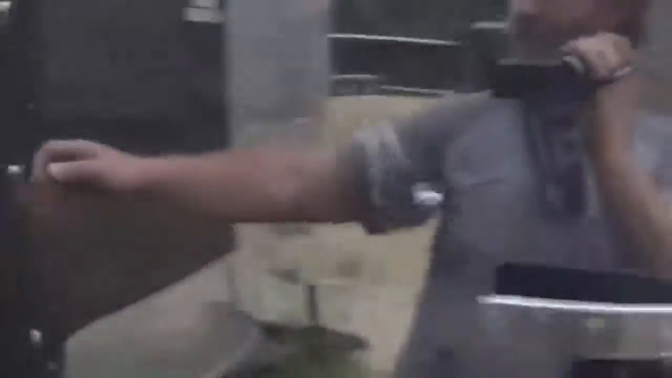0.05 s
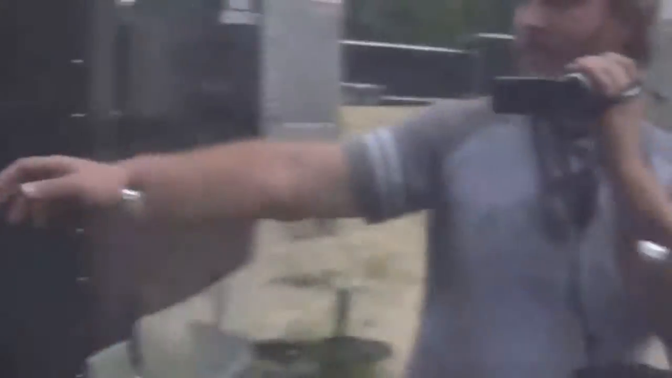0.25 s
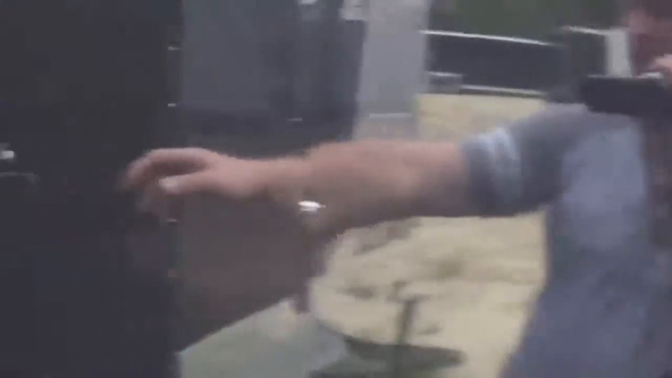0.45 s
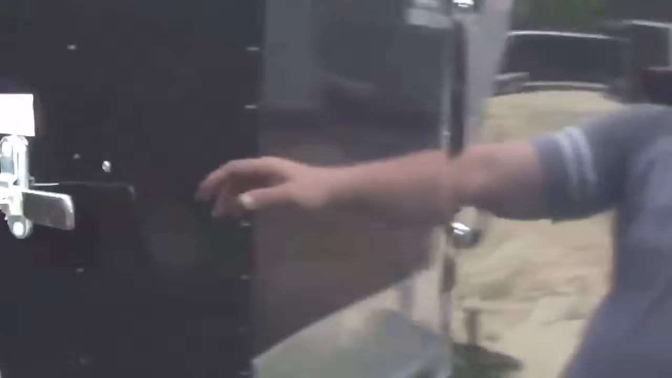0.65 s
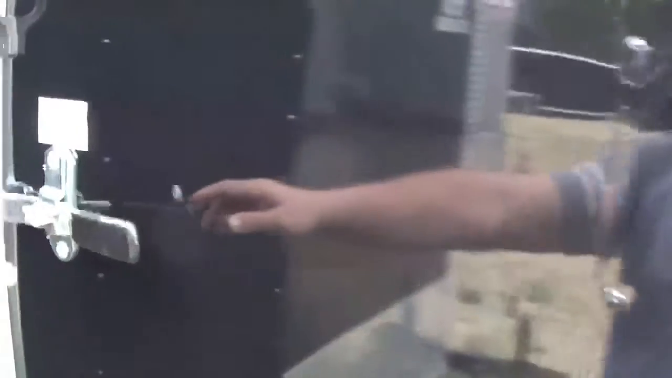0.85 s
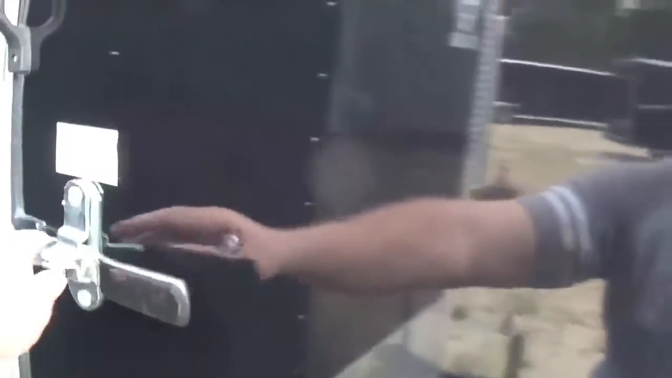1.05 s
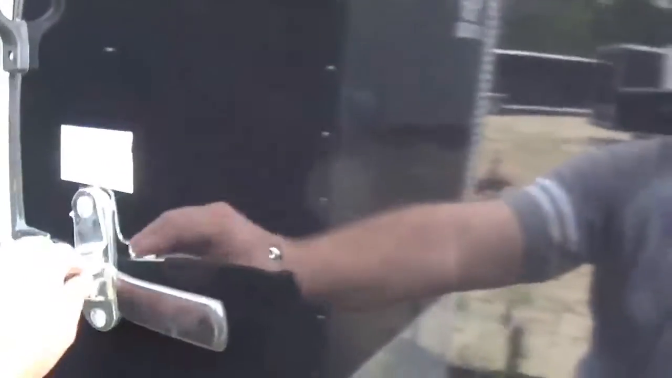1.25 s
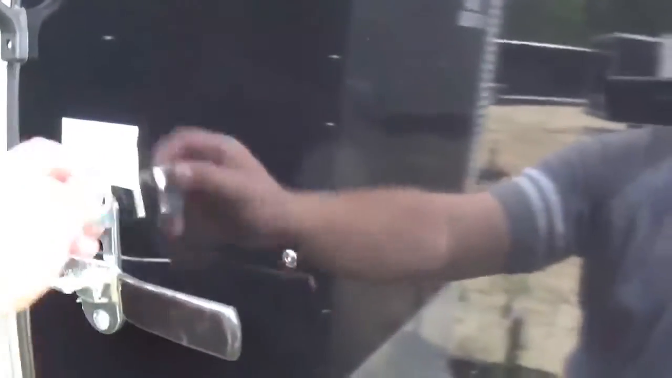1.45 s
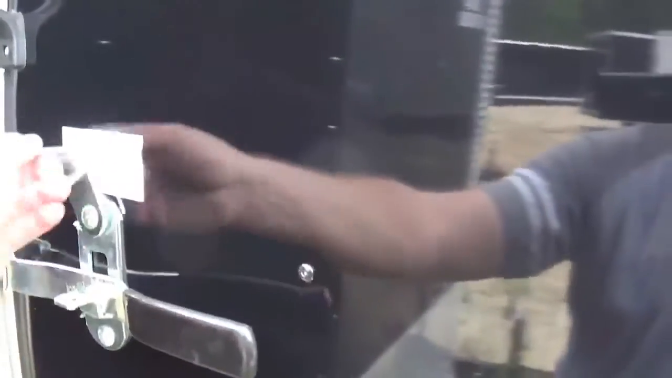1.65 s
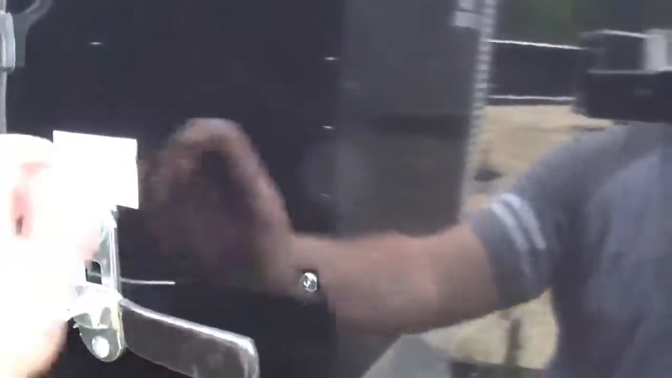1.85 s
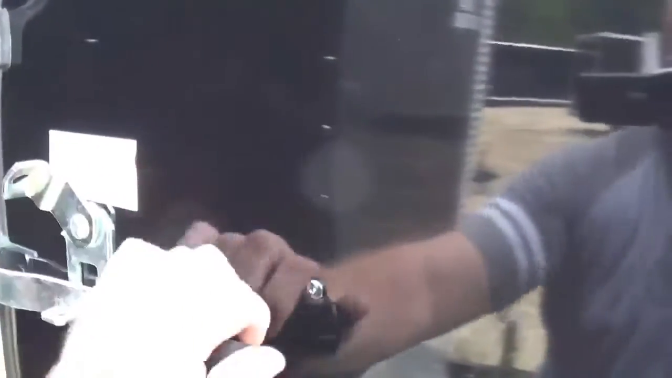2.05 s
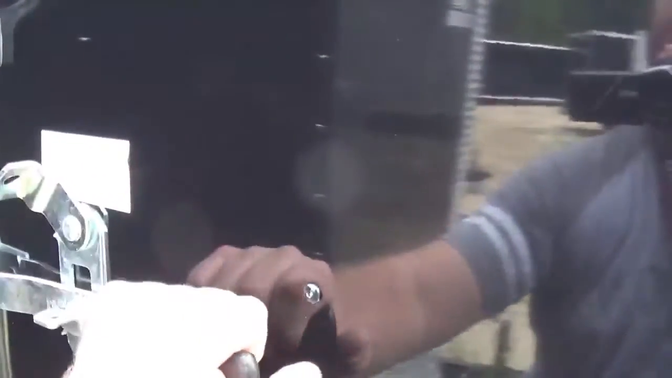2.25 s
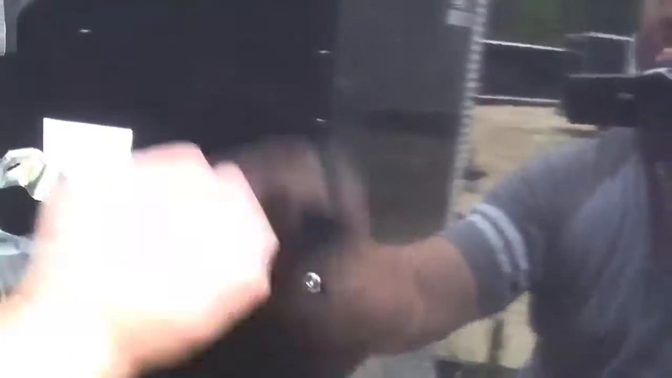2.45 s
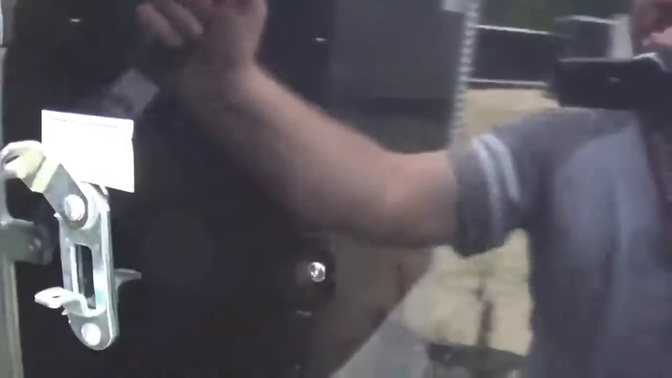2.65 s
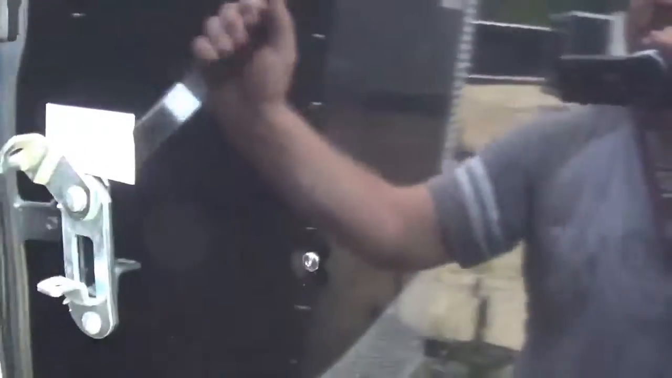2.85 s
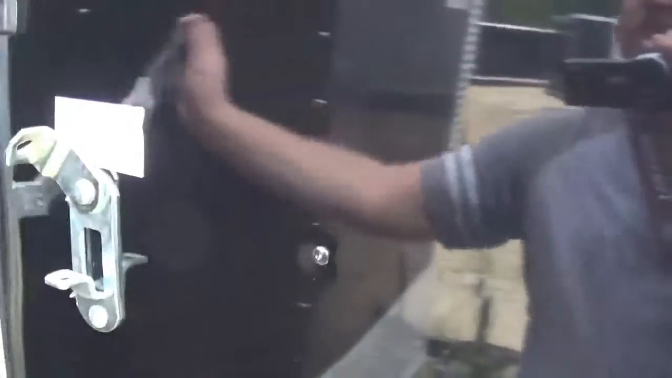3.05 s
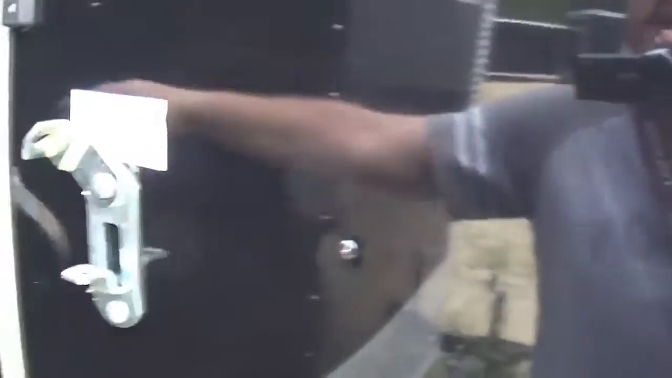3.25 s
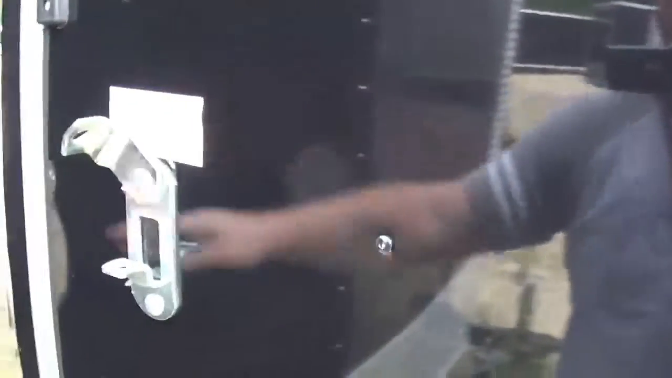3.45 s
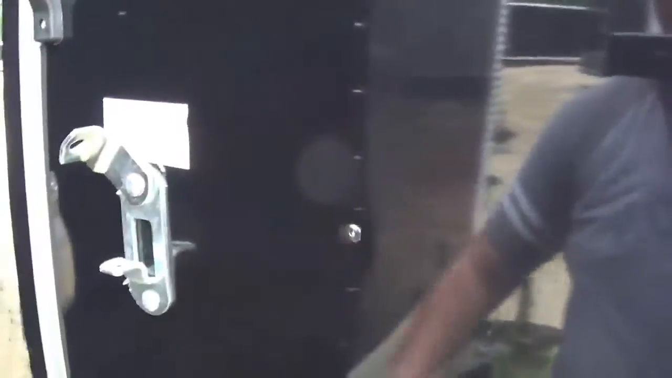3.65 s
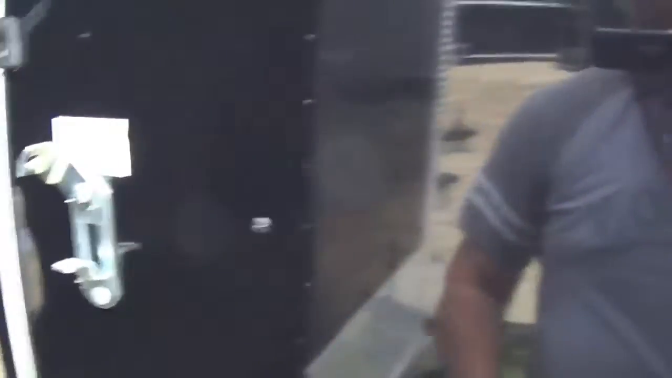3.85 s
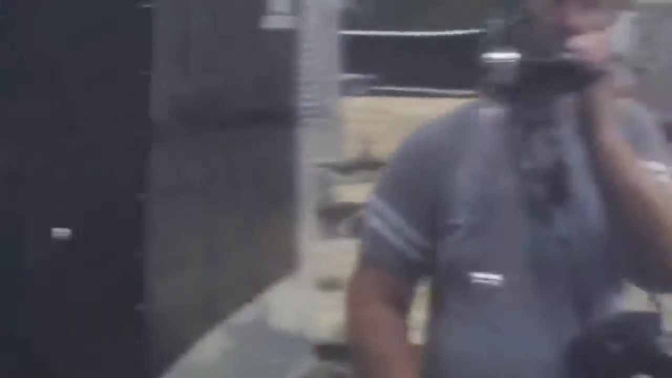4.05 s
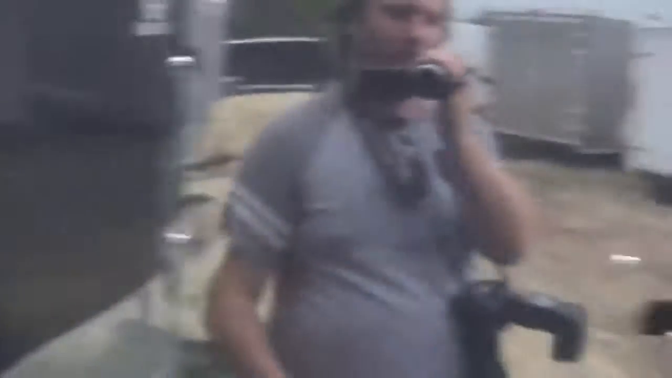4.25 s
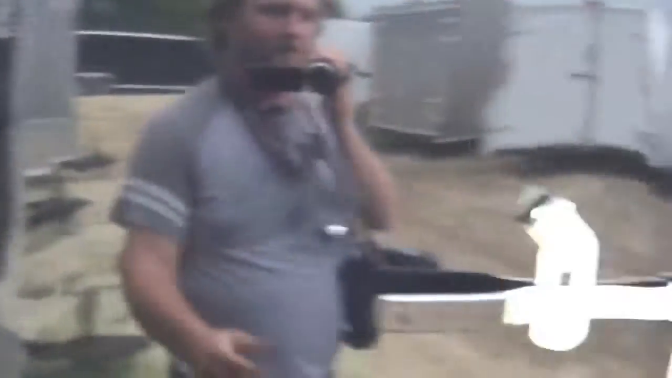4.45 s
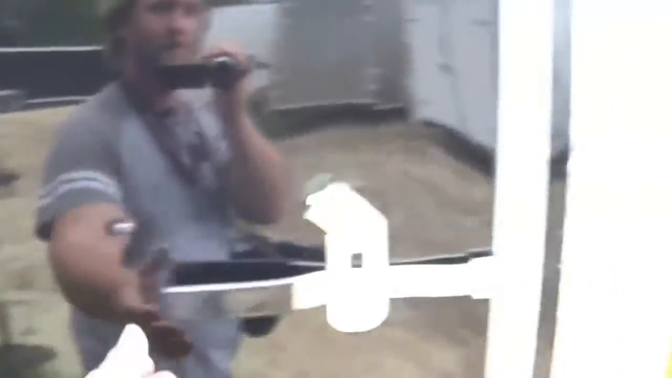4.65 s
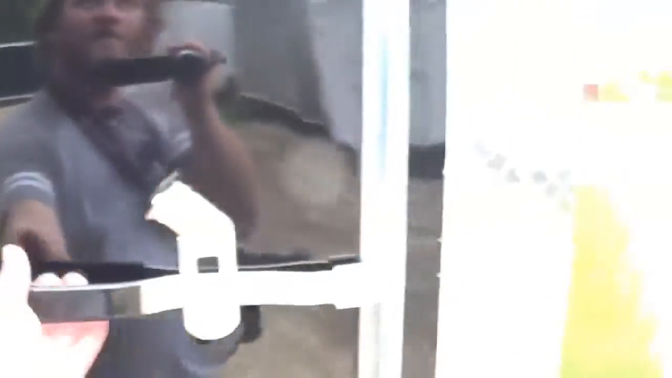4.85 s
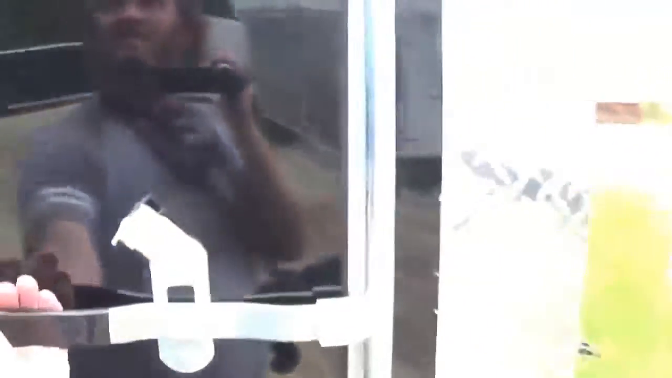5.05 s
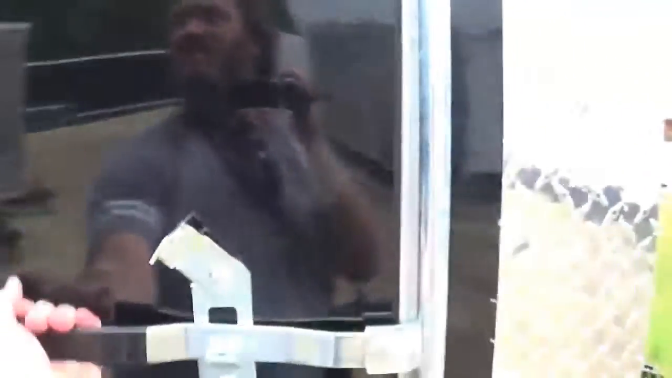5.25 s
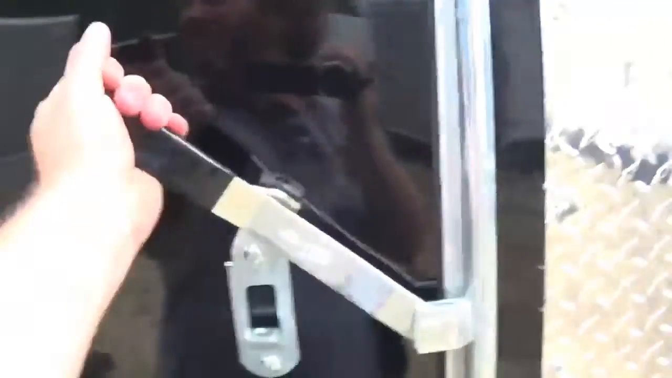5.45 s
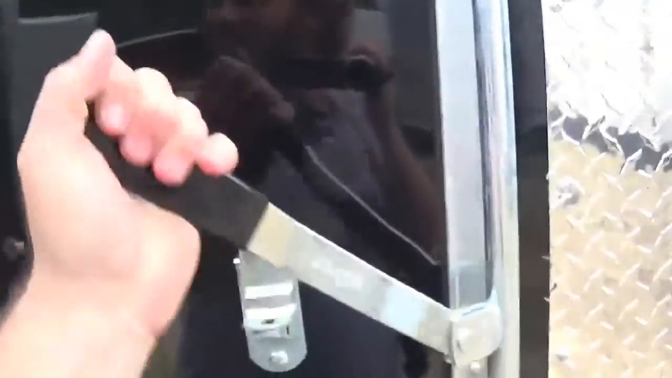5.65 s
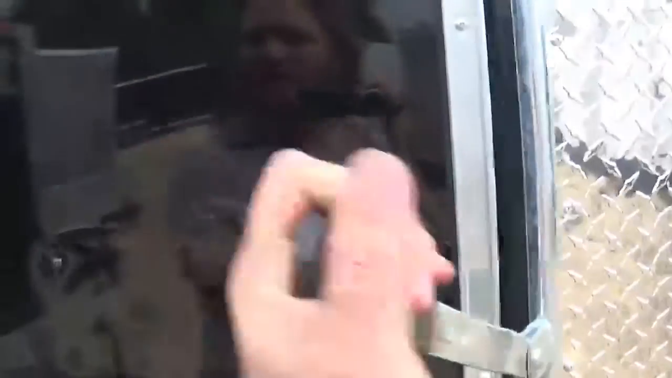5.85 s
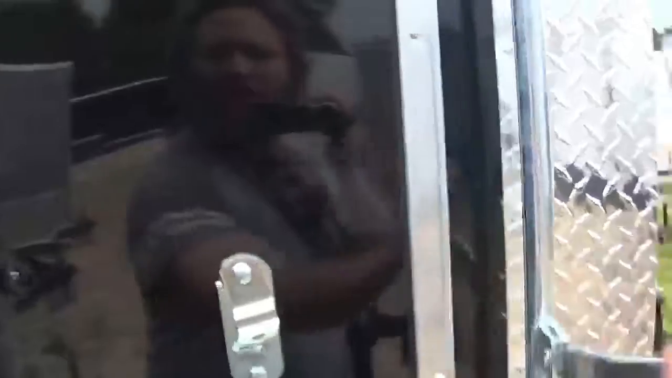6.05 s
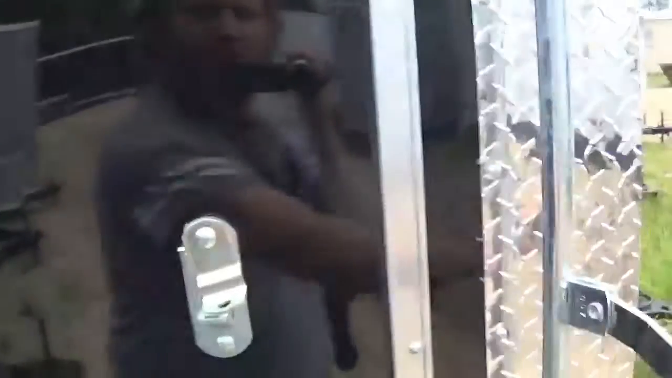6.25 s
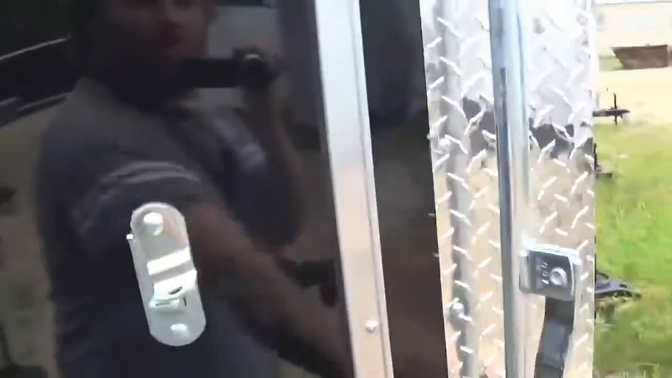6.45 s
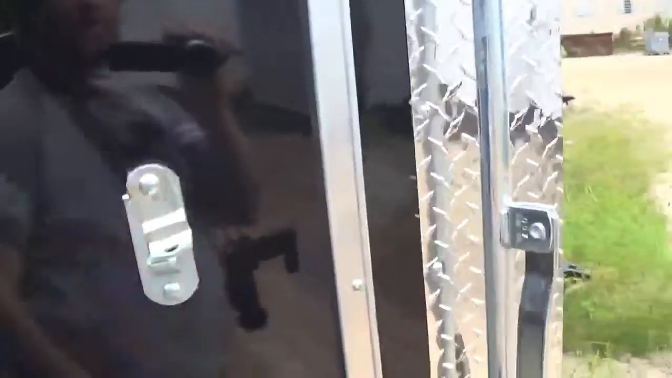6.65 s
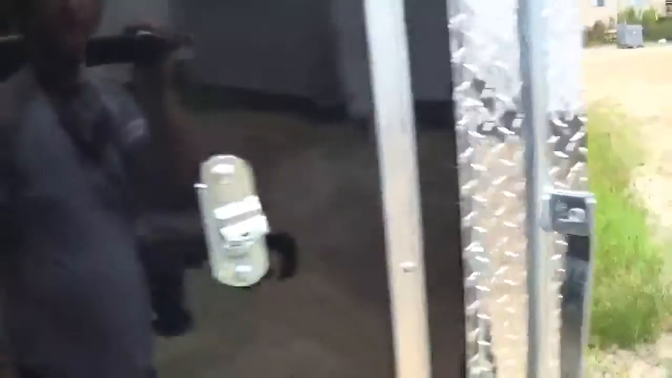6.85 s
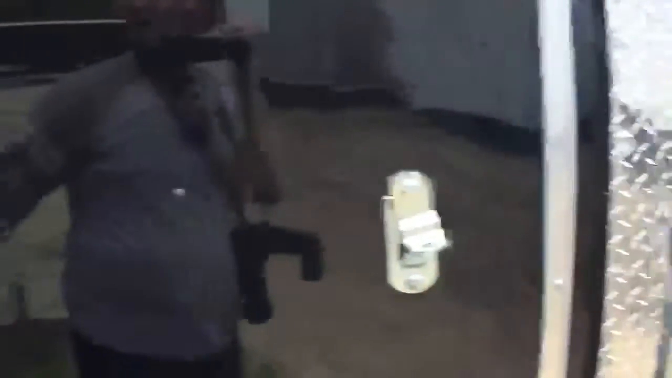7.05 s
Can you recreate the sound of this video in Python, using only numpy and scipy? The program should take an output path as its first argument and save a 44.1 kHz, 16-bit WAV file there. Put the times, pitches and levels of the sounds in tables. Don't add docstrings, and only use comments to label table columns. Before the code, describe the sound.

Wind thumps a nearby microphone as hands work steel bar latches on a trailer door, with sharp clanks, rattles and hollow sheet-metal booms.

```python
import sys
import numpy as np
from scipy import signal
from scipy.fft import rfft, irfft
from scipy.io import wavfile
from scipy.ndimage import uniform_filter1d

SR = 44100
rng = np.random.default_rng(int(sys.argv[2]) if len(sys.argv) > 2 else 0)


def master_out(mix):
    frames = np.transpose(np.atleast_2d(mix))
    ceiling = np.clip(frames, -1, 1)
    pcm = np.round(ceiling * 32767).astype(np.int16)
    wavfile.write(sys.argv[1], SR, pcm)


def attenuation_scalar(level_db):
    decades = np.asarray(level_db, float) / 20
    return 10 ** decades


N = 313551

# pitch_hz, density_db
WIND_COLOUR = [(12, -42), (20, -3), (92, 5.5), (177, -0.5), (260, -12.5), (420, -30.5), (900, -36.5),
               (1980, -120)]
# pitch_hz, density_db
RUSTLE_COLOUR = [(150, -16), (250, 5), (480, -2.5), (900, -2), (3240, -14.5), (6670, -11), (8900, -5.5),
                 (11200, -8.5)]
# start_s, hold_s, level_db, fall_db_per_s
GUSTS = [(0.08, 0.16, -20.5, 69), (0.246, 0.07, -20.5, 78), (0.434, 0.029, -20.5, 85),
         (0.91, 0.057, -27, 60), (1.079, 0.12, -18.5, 134), (1.46, 0.0097, -17, 208),
         (1.714, 0.022, -23, 52), (2.035, 0.026, -19, 46), (2.157, .02, -49, 25), (2.61, 0.018, -21.5, 57),
         (2.906, 0.018, -18.5, 130), (3.09, 0.029, -24, 65), (3.31, 0.1, -27, 60), (3.5, 0.28, -30.5, 21),
         (4.498, 0.021, -27, 24), (5.44, .01, -30, 300), (5.576, 0.007, -23, 250), (5.626, .02, -36, 35),
         (6.27, 0.023, -37, 62), (6.563, 0.28, -34, 50), (7.047, 0.018, -25.5, 52)]
# middle_s, level_db, pitch_hz
POPS = [(0.252, -12.5, 142), (0.2912, -12.5, 145), (0.444, -17, 131), (0.781, -27, 87),
        (0.8917, -14.5, 118), (1.2096, -18, 152), (1.2247, -9.5, 132), (1.253, -14, 175),
        (1.345, -16.5, 129), (1.4006, -16, 130), (1.4738, -13, 107), (1.7097, -30, 130), (1.833, -20, 128),
        (1.962, -16, 111), (2.266, -21, 111), (2.8928, -17, 151), (2.9264, -14.5, 151), (2.988, -18.5, 98),
        (3.1, -22.5, 121), (3.198, -33, 110), (3.7075, -30, 121), (3.9127, -27, 111), (5.4353, -9, 120),
        (5.668, -30, 130)]
# start_s, hold_s, dull_db, bright_db
MOVES = [(0.09, 0.43, -36, -43.5), (0.34, 0.16, -61, -30.5), (0.687, 0.062, -36, -31.5),
         (1.018, 0.019, -36.5, -35.5), (1.297, 0.018, -36, -34.5), (1.59, 0.053, -45, -48.5),
         (1.777, 0.036, -30.5, -42.5), (2.1, 0.016, -44.5, -48), (2.21, 0.02, -47, -47.5),
         (2.347, 0.023, -45, -75), (4.03, 0.43, -57, -47.5), (4.68, 0.17, -50.5, -45),
         (4.908, 0.043, -38, -37.5), (5.243, 0.057, -44, -44.5), (5.393, 0.53, -41.5, -48),
         (6.147, 0.024, -40.5, -41), (6.396, 0.15, -42.5, -45.5), (7.004, 0.12, -49.5, -40)]
# start_s, level_db, colour_hz
SNAPS = [(0.1515, -30, 9000), (0.2112, -18, 9650), (.2334, -31, 9500), (.43, -27, 6000), (.4628, -18, 9800),
         (0.668, -28, 8000), (1.0111, -29, 9500), (1.0273, -20, 9000), (1.052, -25, 9000),
         (1.112, -31, 6340), (1.1226, -29, 6130), (1.147, -27.5, 9800), (2.0898, -25, 9300),
         (4.0984, -40, 9600), (4.216, -36, 9000), (4.3035, -50, 9700), (4.375, -35, 9700),
         (4.654, -32, 9700), (5.0009, -28, 9500), (5.352, -42, 3000), (5.4285, -16, 8000),
         (5.568, -24, 4000), (5.8034, -15, 7000), (5.751, -18, 6000), (6.099, -39, 3520), (6.49, -20, 4500),
         (6.5068, -16, 6200), (6.7085, -32, 3500), (7.09, -32, 9800)]
# start_s, hold_s, end_boom_db, rattle_db, fall_db_per_s
BOUTS = [
    (1.444, 0.18, -29.5, -42, 240),
    (1.744, 0.13, -24, -37, 230),
    (2.028, 0.093, -25.5, -64, 159),
    (2.555, 0.13, -17.5, -24, 79),
    (3.355, 0.029, -27, -31, 63),
    (3.391, 0.16, -17.5, -27, 78),
    (5.419, 0.12, -23.5, -26.5, 55),
    (5.733, 0.1, -28.5, -28.5, 81),
    (6.512, 0.13, -17.5, -27, 100),
]
# pitch_hz, width_hz, level_db
DOOR = [(161, 35, -1.5), (230.8, 17.4, 6), (248.7, 64, -1), (288, 22.4, 1.5), (350, 54, -7.5),
        (406, 27, -2.5), (480, 138, -4.5), (620, 430, -11.5)]
# pitch_hz, width_hz, level_db
PLATES = [(668.5, 50, 6), (735, 15, 8.5), (899, 340, 8.5), (1126, 46, 6.5), (1272, 35.4, 3),
          (1635, 340, 11.5), (1970, 280, 6), (2103, 260, 9.5), (2470, 940, -4), (3070, 300, 5.5),
          (3640, 360, -38)]
# start_s, level_db, pitch_hz, t60_s
THUDS = [(.667, -22.5, 480, 0.038), (1.55, -23, 411, 0.18), (2.088, -18, 406, 0.079),
         (2.564, -18, 333, 0.15), (2.655, -17, 484, 0.14), (2.24, -35, 298.5, 0.28), (2.35, -35, 369, 0.21),
         (2.925, -21, 416, 0.043), (3.252, -22, 696, 0.017), (3.343, -26, 510, 0.054),
         (4.891, -22, 251.4, 0.33), (4.995, -31, 699, 0.19), (5.015, -5, 636, 0.0094),
         (5.387, -25, 340.5, 0.3), (5.06, -30.5, 301, 0.11), (5.509, -24.5, 295, 0.13),
         (5.55, -14.5, 258, 0.069), (5.82, -20, 350, 0.071), (6.494, -21, 185, 0.29),
         (6.578, -12.5, 241, 0.45), (6.672, -14.5, 152.7, 0.17)]
# start_s, level_db, pitch_hz, t60_s
CHINKS = [(1.3146, -28, 1690, .08), (1.332, -22, 1680, 0.053), (1.357, -26, 1660, 0.07),
          (1.405, -34, 1740, 0.084), (1.426, -47, 1900, 0.059), (1.426, -44, 3830, 0.11),
          (1.5465, -28, 1640, 0.15), (1.7506, -32.5, 2090, 0.36), (1.806, -24, 2110, 0.27),
          (1.73, -52, 6970, 0.24), (1.5465, -12.5, 5570, 0.0091), (.728, -32.5, 1500, 0.23),
          (.728, -36.5, 2950, .15), (.78, -39, 1500, 0.16), (1.81, -35, 10300, 0.054),
          (2.6345, -17, 9460, 0.056), (2.7074, -26, 7600, .03), (2.7074, -23.5, 2300, .15),
          (2.787, -32, 5960, 0.035), (4.484, -35, 1696, 0.041), (3.381, -36, 7100, .06),
          (3.4316, -26, 6000, .05), (3.447, -28, 5770, 0.15), (3.447, -24.5, 2290, 0.087),
          (3.478, -27.5, 3140, 0.24), (3.455, -22, 8650, 0.15), (5.622, -27, 5300, 0.036),
          (5.754, -21, 6260, 0.052), (5.754, -20, 2070, 0.057), (5.802, -25, 6380, 0.048),
          (6.49, -19, 3560, 0.034), (6.49, -18.5, 5660, 0.016), (6.5065, -24, 8960, 0.13),
          (6.5065, -22, 5600, .03), (6.5645, -23, 4520, 0.033), (6.574, -18, 4550, 0.038),
          (6.574, -24, 9400, 0.072), (6.625, -28, 3950, 0.056), (6.645, -27, 3170, 0.07)]
# start_s, level_db, pitch_hz, t60_s
MORE_CHINKS = [(1.789, -44, 10400, 0.08), (1.8105, -26.5, 10380, 0.049), (1.8165, -27, 6950, 0.033),
               (1.819, -37, 10600, 0.046), (1.857, -34, 10500, 0.078), (1.86, -20, 4590, .04),
               (1.861, -22.5, 5647, 0.053), (1.5468, -20.5, 8600, 0.012), (1.5468, -20.5, 3050, 0.04),
               (1.332, -30, 3870, 0.055), (2.5175, -39, 6560, .05), (2.5175, -29, 9960, .05),
               (3.355, -42, 6040, .1), (3.381, -28, 6150, 0.037), (5.4495, -29, 2700, 0.018),
               (5.4545, -24, 2600, .02), (5.497, -19, 10900, .04), (5.504, -17, 8640, .02),
               (5.755, -18, 3340, 0.028), (5.787, -34, 3470, 0.071), (5.881, -17, 1140, 0.045),
               (6.5645, -21, 5630, 0.033), (6.595, -27, 4300, 0.035)]

# start_s, level_db, tilt_db_per_octave, held_s (time until a hand or stop damps the part)
HANDLE = [(2261, -9, .25), (3510, -14, .3), (5548, 0, .3), (6433, -19, .5), (10143, -16, .3),
          (10200, -2, .4)]
HANDLE_STRIKES = [
    (5.496, -29, 2, 0.0066),
    (5.52, -39, -9, .06),
    (5.58, -40.5, -15, 0.055),
    (5.632, -22.5, -2, 0.082),
    (5.761, -42, -6, 0.019),
    (5.787, -41, 12, 0.091),
    (5.807, -38.5, 6, 0.053),
    (5.874, -40, 14, 0.028),
    (5.914, -57, 5, 0.044),
]
SEATED = [(5548, 0, .5), (5640, -8, .1), (6433, -18, .2), (10140, 0, .9), (10260, -9, .1)]
SEATED_STRIKES = [
    (5.458, -20.5, 2.6, 0.014),
    (5.482, -24, -1, 0.0085),
    (5.873, -27.5, -0.19, 0.011),
]
HASP = [(2290, -12, .12), (5586, -5, .4), (5630, 0, .45), (6557, -7, .45), (10150, -10, .15),
        (10458, -6, .2)]
HASP_STRIKES = [
    (1.42, -52, 1, 0.11),
    (1.811, -27, 0, 0.0089),
    (1.796, -40, -10, 0.014),
    (1.863, -42, -5, 0.024),
    (1.908, -53, -1, 0.026),
    (2.635, -24, -6, 0.03),
    (2.68, -37, 8, 0.02),
    (2.709, -37, 14.5, 0.046),
    (2.786, -50, 9, 0.011),
]
ROD = [(1104, -8, .25), (8736, 0, .46), (8787, -8, .4), (9011, -10, .12), (9317, -14, .15)]
ROD_STRIKES = [
    (5.508, -36, 9, 0.03),
    (5.531, -30.5, -3, 0.11),
    (5.68, -60, 10, 0.045),
    (6.522, -29, -3.5, 0.043),
    (6.579, -29.5, 8, 0.034),
    (6.607, -19, -0.5, 0.043),
    (6.63, -21, 0, .28),
]
CAM = [(1104, -4, .2), (3128, -13, .2), (8361, 0, .45), (8450, -6, .35), (8683, 0, .2), (9060, -12, .2)]
CAM_STRIKES = [
    (3.413, -41, 4, 0.03),
    (3.451, -32, -4, 0.026),
    (3.476, -26, -2, 0.025),
    (3.509, -23, -2.5, 0.24),
]

# start_s, crack_db, knock_db, knock_hz
ON_PLATE = [(1.3143, -21, -17.5, 1720), (1.3316, -24, -13, 1870), (1.3594, -40, -18, 1640),
            (1.402, -38, -21.5, 1680), (1.7346, -46, -40, 1840), (1.7506, -37, -26, 2120),
            (1.797, -15, -18, 2100), (1.817, -11, -13, 885), (2.0899, -32, -21, 760),
            (2.5641, -22, -9.5, 840), (2.5994, -13, -19, 1200), (3.371, -36, -13, 1650),
            (3.3809, -27, -15, 700), (3.477, -12.5, -8.5, 735), (4.3281, -33, -40, 826),
            (5.4177, -25, -11, 1760), (5.752, -15, -11, 1800), (5.8215, -14.5, -11.5, 1070),
            (6.49, -22, -15.5, 1040)]
ON_CAM = [
    (1.5467, -14, -14.5, 1670),
    (3.3397, -31, -15, 660),
    (6.554, -15.5, -45, 964),
    (6.5645, -7.5, -17, 1870),
    (6.574, -11, -28, 1100),
]
ON_HASP = [(.73, -24, -32, 1600), (.785, -39, -27, 1450), (1.1096, -44, -33, 716),
           (1.4258, -32, -20.5, 1870), (1.8105, -31, -11, 2140), (1.857, -20, -17.5, 1250),
           (2.5167, -12, -13.5, 1120), (2.6328, -19, -13, 1230), (2.7857, -31, -23, 1330),
           (3.4315, -17, -11, 900), (3.4461, -8.5, -18.5, 2230), (5.4967, -12, -11, 1140),
           (5.6323, -19, -16.5, 2240), (5.7644, -25, -16.5, 1640)]
ON_ROD = [(2.587, -15, -22, 820), (3.4123, -31, -12.5, 705), (3.5056, -8.5, -16, 1060),
          (5.4235, -9, -25, 1140), (5.5656, -39, -15, 1150), (6.507, -6, -24, 1080),
          (6.593, -14, -43, 1130), (6.6244, -14, -37, 1030), (6.6446, -10, -38, 1110),
          (6.68, -17, -39, 1100), (6.7085, -34, -53, 694)]
ON_HANDLE = [
    (2.7074, -9.5, -13, 2230),
    (2.7392, -17, -14, 1040),
    (5.4578, -6, -10, 1210),
    (5.4795, -7, -17, 1120),
    (5.7875, -28, -20, 700),
    (5.8022, -16, -16, 1720),
    (5.8318, -23, -20, 1080),
    (5.8637, -15, -11.5, 1120),
    (5.874, -6, -13.5, 1280),
]
ON_STOP = [
    (1.2195, -42, -27, 921),
    (2.0804, -53, -18, 700),
    (4.484, -30, -22.5, 1750),
    (5.385, -30, -18, 1160),
    (5.6424, -9.5, -11, 1970),
    (5.7136, -32, -13.5, 1140),
    (6.1548, -26, -24, 1730),
]
# start_s, crack_db, knock_db
TICKS = [(0.21, -30, -48), (0.479, -10.5, -22), (0.621, -36, -25), (0.667, -16, -24), (1.036, -12.5, -19.5),
         (1.143, -41, -32), (2.349, -29, -51), (2.372, -20, -63), (3.748, -29, -37), (4.18, -27, -53),
         (4.207, -27, -42), (4.353, -27, -56), (4.654, -41, -45), (4.6785, -23, -30.5),
         (4.8906, -40, -26.5), (5.2886, -36, -29.5), (6.811, -28, -26.5), (6.941, -26, -46),
         (7.1054, -14.5, -28)]
TICK_KNOCK_HZ = 1080
# blows, crack_hz, t60_s, grit_db (against the colour)
STRUCK = [(ON_PLATE, 3530, 0.11, 0), (ON_CAM, 4550, 0.081, 0), (ON_HASP, 4900, 0.11, 0),
          (ON_ROD, 10100, 0.051, -0.058), (ON_HANDLE, 11400, 0.077, 0), (ON_STOP, 4400, 0.026, 0.85),
          ([(*row, TICK_KNOCK_HZ) for row in TICKS], 9300, 0.068, -3.5)]

# pitch_hz, likeness
SAME = [(60, 0.73), (220, 1), (830, 0.61), (3100, 0.38), (11500, 0.8)]
# pitch_hz, level_db
LEAN = [(60, -0.5), (2500, 1.16), (11000, 0)]
# pitch_hz, lead_rad
LEAD = [(0, -0.28), (260, 0.72), (5680, -0.28), (11700, 0.11)]


def evened(x):
    return x / np.sqrt(np.mean(x ** 2) + 1e-20)


def steady(x, s):
    return x / np.sqrt(uniform_filter1d(x ** 2, int(s * SR)) + 1e-12)


def read(points, hz):
    f, value = np.transpose(points)
    return np.interp(np.log(hz + 1), np.log(f + 1), value)


def add(mix, s, sound):
    part = mix[..., round(s * SR):][..., :sound.shape[-1]]
    part += sound[..., :part.shape[-1]]


def band(x, lo_hz, hi_hz):
    edges = [lo_hz, min(hi_hz, SR / 2.1)]
    return signal.sosfilt(signal.butter(2, edges, "bandpass", fs=SR, output="sos"), x)


def coloured(x, colour):
    return irfft(rfft(x) * attenuation_scalar(read(colour, np.fft.rfftfreq(N, 1 / SR))), N)


def clicks(per_s, spread_db):
    size = attenuation_scalar(spread_db * np.minimum(rng.exponential(1, N), 4))
    return size * np.sign(rng.standard_normal(N)) * (rng.random(N) < per_s / SR)


def swell(s, hold, db, rise_db_s, fall_db_s, build_db_s=0):
    t = np.arange(0, N + 64, 64)[:, None] / SR
    left = s + hold
    rise = rise_db_s * np.maximum(s - t, 0)
    build = build_db_s * np.clip(left - t, 0, hold)
    fall = abs(fall_db_s) * np.maximum(t - left, 0)
    gain = np.sqrt((attenuation_scalar(db - rise - build - fall) ** 2).sum(1))
    return np.interp(np.arange(N) / SR, t[:, 0], gain)


def patchy(x, depth_db, size):
    z = signal.stft(x, nperseg=256)[2]
    patches = uniform_filter1d(rng.standard_normal(z.shape[::-1]), size[0], 0)
    patches = uniform_filter1d(patches, size[1], 1)
    return evened(signal.istft(z * attenuation_scalar(depth_db * evened(patches).T), nperseg=256)[1][:N])


def modes(x, table):
    out = 0
    for k, (hz, width, db) in enumerate(table):
        r = np.exp(-np.pi * width / SR)
        turn = 2 * np.pi * hz / SR
        ringing = signal.lfilter([1 - r], [1, -2 * r * np.cos(turn), r * r], x)
        out = out + (-1) ** k * attenuation_scalar(db) * ringing * np.sin(turn)
    return out


def clank(t, hz, db, t60):
    turns = hz * t + rng.random(hz.shape)
    ringing = (attenuation_scalar(db - 60 * t / t60) * np.sin(2 * np.pi * turns)).sum(0)
    return ringing / np.sqrt((attenuation_scalar(db) ** 2).sum() / 2)


def wind():
    thumps = evened(clicks(400, 2.2))
    eddies = thumps + 1.3 * rng.standard_normal(N)
    bunches = attenuation_scalar(2.5 * evened(band(rng.standard_normal(N), 3, 12)))
    s, hold, db, fall = np.transpose(GUSTS)
    lull_db = -44.5
    gust = np.hypot(swell(s, hold, db, 97, fall), attenuation_scalar(lull_db))
    flaps = attenuation_scalar(5.0) * gust ** 2 * bunches * evened(band(thumps, 168, 370))
    rumble = steady(bunches * steady(coloured(eddies, WIND_COLOUR), 0.0423), 0.36)
    return flaps + gust * rumble * attenuation_scalar(-3.5)


def pops():
    out, t = np.zeros(N), np.arange(-882, 882) / SR
    for s, db, hz in POPS:
        push = np.cos(2 * np.pi * hz * t) * np.exp(-(1.87 * (hz * t - .12)) ** 2)
        add(out, s + t[0], attenuation_scalar(db) * push)
    return out * attenuation_scalar([[.4], [-.4]])


def rustle():
    grains = coloured(evened(clicks(3000, 1.0)) + 0.68 * rng.standard_normal(N), RUSTLE_COLOUR)
    s, hold, dull_db, bright_db = np.transpose(MOVES)
    rise_db_s, fall_db_s = 119, 86
    still_dull_db, still_bright_db = -46.5, -54
    dull = np.hypot(swell(s, hold, dull_db, rise_db_s, fall_db_s), attenuation_scalar(still_dull_db))
    bright = np.hypot(swell(s, hold, bright_db, rise_db_s, fall_db_s), attenuation_scalar(still_bright_db))
    dull = dull * patchy(band(grains, 268, 4010), 1.85, size=(8, 8))
    bright = bright * patchy(band(grains, 1720, 16130), 1.67, size=(5, 36))
    return dull + bright * attenuation_scalar(0.5)


def snaps():
    out, t = np.zeros(N), np.arange(int(0.034 * SR)) / SR
    t60_s = 0.016
    for s, db, hz in SNAPS:
        noise = rng.standard_normal(len(t))
        add(out, s, attenuation_scalar(db - 60 * t / t60_s) * evened(band(noise, 0.65 * hz, 1.87 * hz)))
    return out


def clatter():
    s, hold, boom_db, rattle_db, fall = np.transpose(BOUTS)
    boom = swell(s, hold, boom_db, 700, fall, build_db_s=49)
    rattle = swell(s, hold, rattle_db, 700, 1.43 * fall, build_db_s=16)
    chatter = evened(clicks(1200, 3.3)) + 0.7 * rng.standard_normal(N)
    skin = steady(modes(band(chatter, 104, 680), DOOR), 0.087)
    deep = evened(band(skin, 170, 480))
    hard = np.minimum(boom / attenuation_scalar(-26.0), 1)
    door = boom * (hard * skin + (1 - hard) * deep)
    plates = evened(modes(chatter, PLATES)) + 0.54 * evened(band(chatter, 166, 3670))
    plates = rattle * patchy(steady(plates, 0.094), 2.3, size=(4, 10))
    fizz = evened(band(chatter, 3030, 6240)) + 1.33 * evened(band(chatter, 7800, 10500))
    jingle = attenuation_scalar(11.5) * rattle ** 1.707
    return door + plates + jingle * steady(fizz, 0.019)


def bumps(table, spread, rise_s):
    out, t = np.zeros(N), np.arange(int(.25 * SR)) / SR
    mode_db = np.array([[-5], [0], [-4], [-8]])
    for s, db, hz, t60 in table:
        patch = hz * (1 + spread * np.array([[-.2], [0], [.13], [.4]]))
        add(out, s, attenuation_scalar(db) * clank(t, patch, mode_db, t60) * np.minimum(t / rise_s, 1))
    return out


def rings(part, strikes):
    out, t = np.zeros(N), np.arange(int(.4 * SR)) / SR
    onset = np.minimum(t / 0.00087, 1)
    for s, db, tilt_db, held in strikes:
        damped_db = -900 * np.maximum(t - held, 0)
        for hz, mode_db, t60 in part:
            flutter = evened(uniform_filter1d(rng.standard_normal(len(t)), 280))
            flutter_db = (1.0 + 1.4 * np.exp(-t / .06)) * flutter
            start_db = db + mode_db + tilt_db * np.log2(hz / 5000)
            level_db = start_db - 60 * t / t60 + damped_db + flutter_db
            tone = np.sqrt(2) * np.sin(2 * np.pi * (hz * t + rng.random()))
            add(out, s, attenuation_scalar(level_db) * tone * onset)
    return out


def blow(t, crack_db, knock_db, knock_hz, crack_hz, t60, grit_db):
    plate_hz, width, plate_db = np.tile(np.transpose(PLATES), 3)[..., None]
    noise = rng.standard_normal(len(t))
    crack_hz = crack_hz * rng.uniform(.87, 1.06)
    spot, near = rng.standard_normal((2, len(width), 1))
    decay = attenuation_scalar(-60 * t / t60)
    snap = 1.5 * np.exp(-t / .0006)
    colour = evened(band(noise, 0.71 * crack_hz, 1.3 * crack_hz))
    colour = colour + 0.66 * evened(band(noise, 0.95 * crack_hz, 1.026 * crack_hz))
    grit = attenuation_scalar(grit_db) * evened(band(noise, 1670, min(2.1 * crack_hz, 10500))) + 0.55 * colour
    crack = attenuation_scalar(crack_db - 14.0) * grit * (attenuation_scalar(-60 * t / (1.16 * t60)) + snap)
    struck_db = plate_db + 2.7 * spot - 9.5 * abs(np.log2(plate_hz / knock_hz))
    knock = clank(t, plate_hz + 1.2 * width * near, struck_db, 1.6 * t60 * (1000 / plate_hz) ** 0.41)
    knock = knock + 0.65 * decay * evened(band(noise, 490, 3060))
    return (crack + attenuation_scalar(knock_db - 7.5) * knock) * np.minimum(t / .0002, 1)


def hits():
    out, t = np.zeros(N), np.arange(int(.12 * SR)) / SR
    for rows, *answer in STRUCK:
        for s, *strength in rows:
            add(out, s, blow(t, *strength, *answer))
    return out


def ports(x):
    hz, _, z = signal.stft(x, SR, nperseg=256)
    share = np.sqrt((1 - np.clip(read(SAME, hz), 0, 1)) / 2) * 1.11
    scattered = z * share[:, None] * np.exp(2j * np.pi * rng.random(z.shape[::-1]).T)
    lean = (attenuation_scalar(read(LEAN, hz) / 2) * np.exp(.5j * read(LEAD, hz)))[:, None]
    both = np.array([(z + scattered) * lean, (z - scattered) / lean])
    return signal.istft(both, SR, nperseg=256)[1][:, :N]


def scene():
    apart = wind()
    apart = 0.52 * apart + 0.82 * band(apart, 170, 1400)
    air = wind() + pops() + np.array([[1], [-1]]) * apart
    steel = rings(HANDLE, HANDLE_STRIKES) + rings(SEATED, SEATED_STRIKES) + rings(HASP, HASP_STRIKES)
    steel = steel + rings(ROD, ROD_STRIKES) + rings(CAM, CAM_STRIKES)
    small = bumps(THUDS, 0.94, 0.0033) + bumps(CHINKS, 0.231, 0.00027)
    near = rustle() + snaps() + clatter() + small + steel + hits()
    return air + ports(near) + ports(bumps(MORE_CHINKS, 0.17, 0.0005))


def low_pass(x):
    return signal.sosfilt(signal.butter(12, 12140, fs=SR, output="sos"), x)


def record(dry):
    limited = 0.8 * np.tanh(dry / 0.74)
    edge = signal.firwin(201, 10988, window=("kaiser", 4.0), fs=SR)
    return low_pass(signal.oaconvolve(limited, edge[None], "same"))


dry = scene()
out = record(dry)
master_out(out)
```